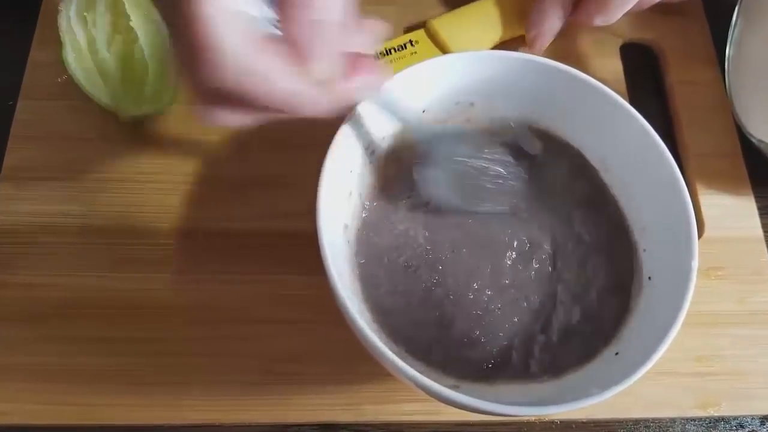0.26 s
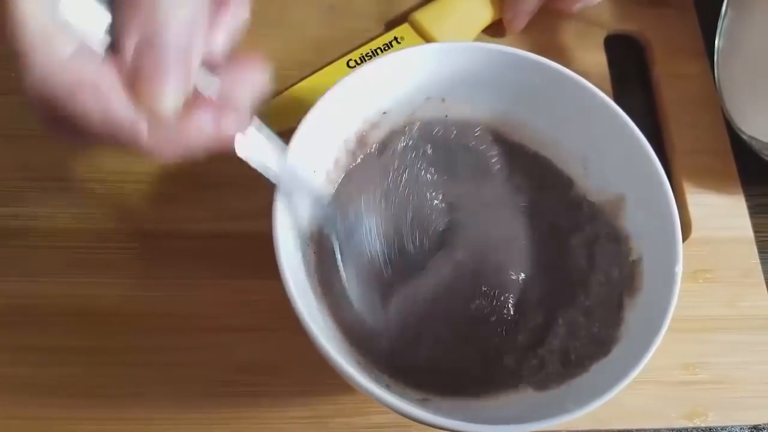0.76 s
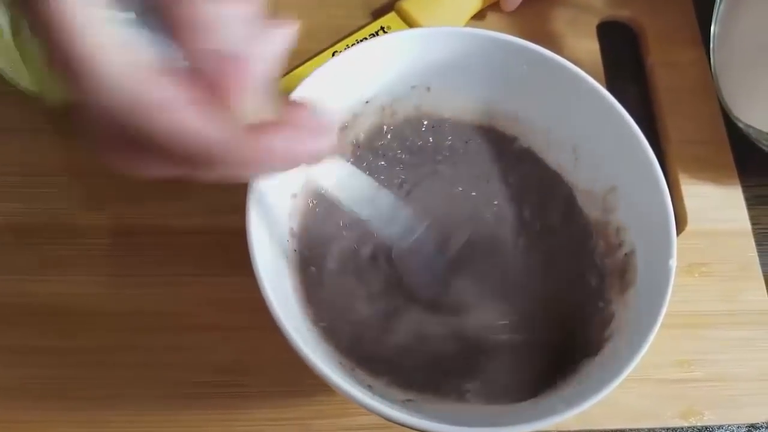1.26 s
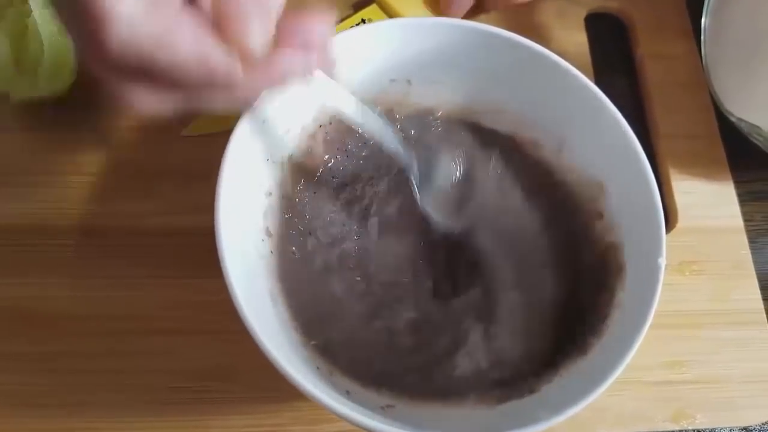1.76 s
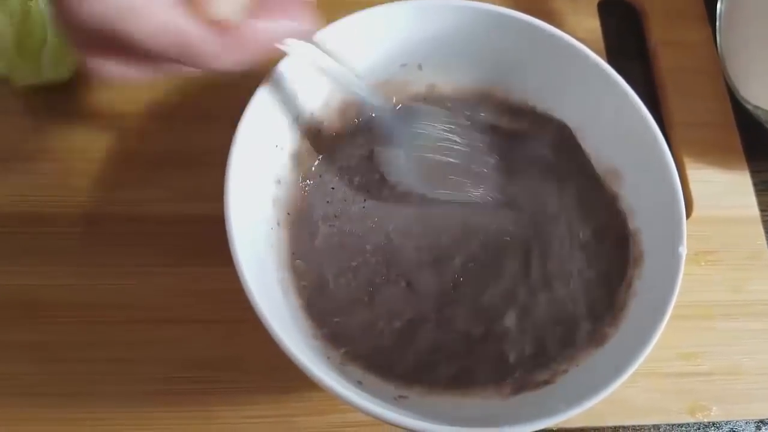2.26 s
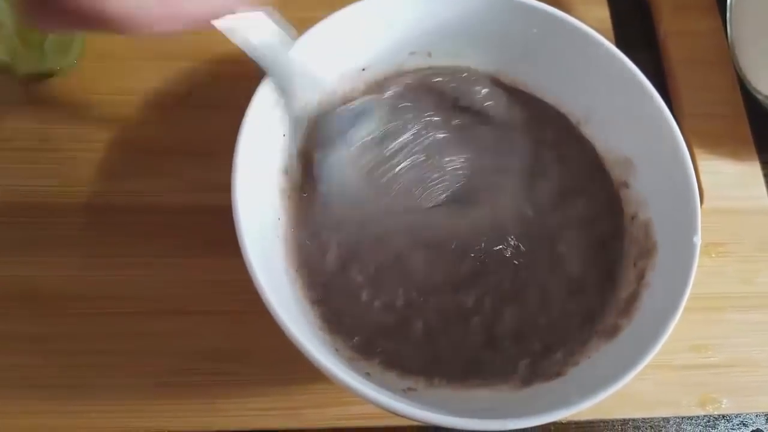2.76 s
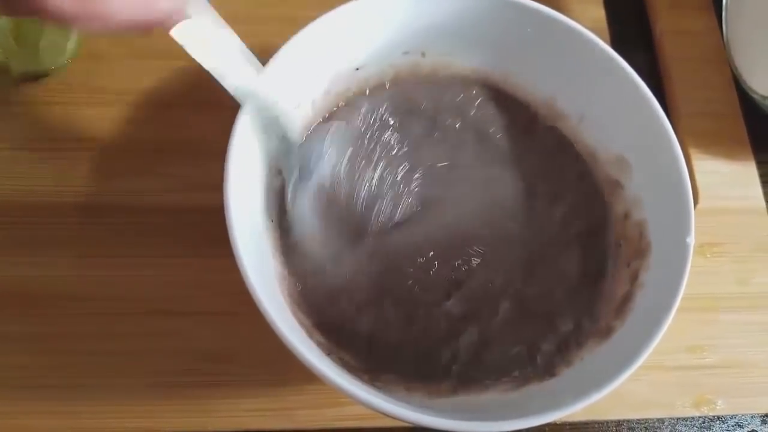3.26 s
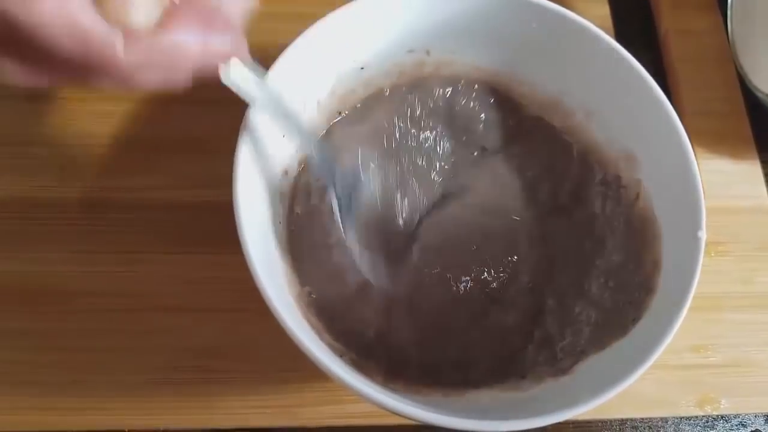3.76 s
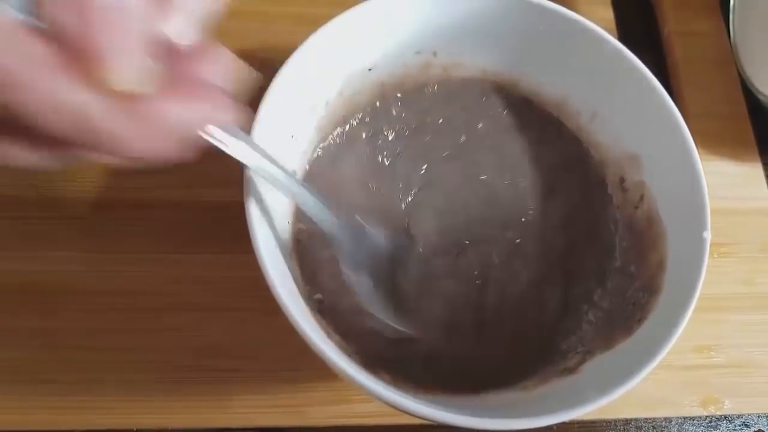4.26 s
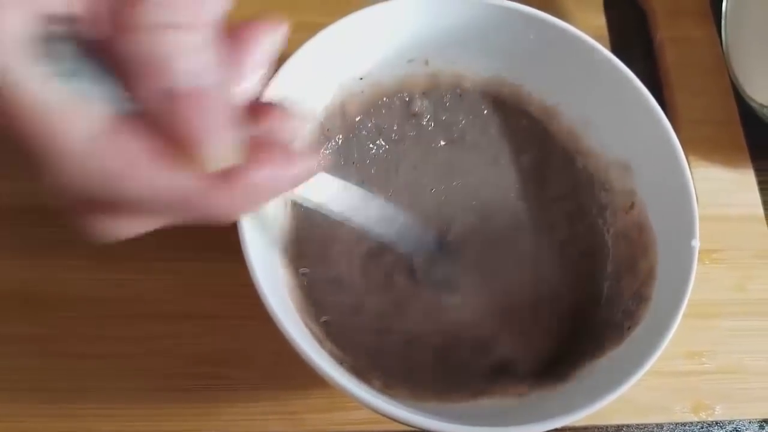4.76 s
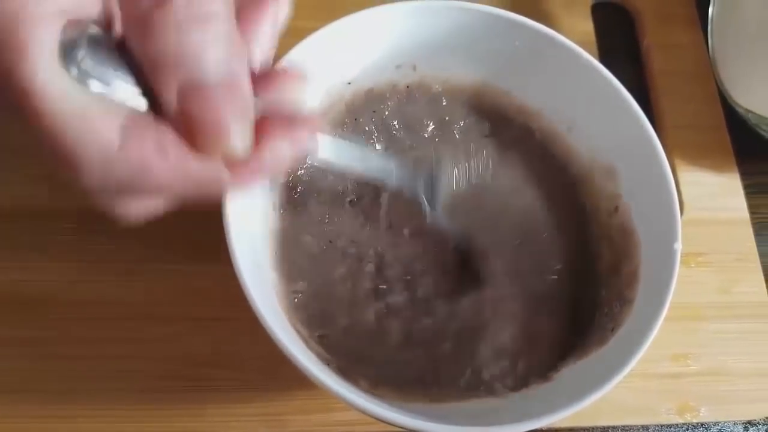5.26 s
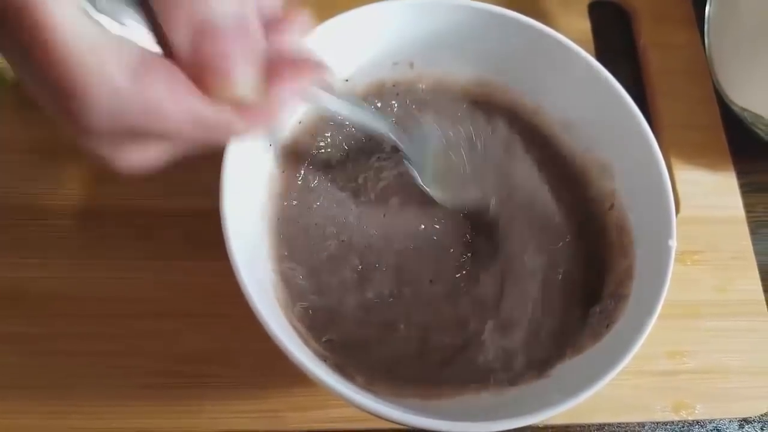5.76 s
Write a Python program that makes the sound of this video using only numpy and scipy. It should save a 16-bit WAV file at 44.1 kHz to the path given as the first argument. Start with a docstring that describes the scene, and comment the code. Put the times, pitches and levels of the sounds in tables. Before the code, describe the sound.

Close up in a small kitchen, a metal utensil briskly beats a thick sauce in a ceramic bowl. Wet, bubbly squelches swell about seven times a second, mixed with popping air pockets and soft plops. Dry clacks against the coated wall grow denser and louder in the second half, with an occasional brighter, short metallic clink. Faint board thumps and a low room hush lie beneath.

```python
"""A wet squelch of bursting bubbles swells about seven times a second as a metal spoon beats thick sauce;
random bubble noise is shaped by resonances of hollow, pocket and slit that differ with each stroke.
Dry knocks and brief clinks on a ceramic bowl excite damped resonances; on bare glaze the spoon rings too.
Air pockets pop, folds of sauce plop and gurgle as swelling tones and filtered puffs of noise, and the
wooden board thumps and rumbles; a small kitchen adds a diffuse echo and a low, wavering room tone."""
import sys
import numpy as np
from scipy import signal
from scipy.fft import rfft, irfft, next_fast_len
from scipy.io import wavfile
from scipy.ndimage import uniform_filter1d, map_coordinates

SR = 44100
rng = np.random.default_rng(int(sys.argv[2]) if len(sys.argv) > 2 else 0)


def digitize_waveform(pressure):
    """Quantize a signal to 16-bit integers and store it at the path in sys.argv[1].

    Rows of a 2-D input are taken as channels; values are limited to [-1, 1].
    """
    field = np.atleast_2d(pressure).T
    bounded = np.clip(field, -1, 1)
    quanta = np.round(bounded * 32767).astype(np.int16)
    wavfile.write(sys.argv[1], SR, quanta)


N = 265041
TIME = np.arange(N) / SR
BLOW = TIME[:SR // 4]   # time axis of one short event
FIRST = SR // 200   # the first five milliseconds of a blow set its level

# Sweeps of the spoon through the sauce: peak_s, rise_s, fall_s, squelch_db, then re squelch
# hollow_db, smack_db, spray_db, then hollow_hz, pocket_hz, slit_hz, slit_left_right_db
STROKES = [(0.027, 0.25, 0.038, -33.5, -11, 1, -11.5, 880, 1510, 2650, 1.5),
           (0.283, 0.076, 0.024, -33, -13, 0.5, -9.5, 830, 1410, 2670, 3.5),
           (0.487, 0.064, 0.03, -31, -24, 0.5, -12, 776, 1650, 2530, 2),
           (0.558, 0.025, 0.035, -45, -4.5, 4.5, -6, 700, 1360, 2600, 2),
           (0.697, 0.053, 0.011, -30.5, -18, 2.5, -9.5, 895, 1490, 2550, 1),
           (0.746, 0.053, 0.038, -45, 1, -12, -5, 720, 1320, 2580, 4),
           (0.885, 0.064, 0.037, -34, -13.5, 2, -8.5, 850, 1450, 2640, -0.5),
           (0.989, 0.051, 0.031, -41.5, -9, 5, -6, 890, 1410, 2750, 1),
           (1.117, 0.051, 0.052, -31, -13, 1.5, -10, 880, 1435, 2650, 4),
           (1.341, 0.044, 0.026, -31.5, -19, 3.5, -8.5, 880, 1470, 2440, -0.5),
           (1.548, 0.058, 0.049, -37.5, -13.5, 0, -14, 890, 1410, 2470, 4),
           (1.809, 0.067, 0.026, -36.5, -15.5, 1.5, -11, 880, 1410, 2590, -1.0),
           (2.02, 0.02, 0.043, -34.5, -11, 3.5, -6, 850, 1350, 2680, 4),
           (2.117, 0.019, 0.24, -46.5, 0.5, -10, -3.5, 830, 1440, 2600, 1.5),
           (2.264, 0.055, 0.021, -35, -29, 1.5, -14.5, 860, 1400, 2630, -2),
           (2.335, 0.019, 0.027, -38.5, -7, 2.5, -11.5, 840, 1490, 2500, 1.5),
           (2.495, 0.09, 0.062, -36.5, -12.5, 0.5, -11.5, 840, 1400, 2440, 4),
           (2.57, 0.0043, 0.021, -26, -11, 6, -4.5, 905, 1510, 2650, 2),
           (2.726, 0.074, 0.036, -35, -9, 2, -9.5, 810, 1310, 2660, 2),
           (2.959, 0.17, 0.013, -37.5, -15, 4, -7, 840, 1340, 2600, 3),
           (3.176, 0.041, 0.096, -30, -7.5, -0.5, -12, 780, 1370, 2560, -1.5),
           (3.3, 0.028, 0.021, -42, -6, 1, -7, 670, 1470, 2520, 3.5),
           (3.414, 0.032, 0.062, -33.5, -8, 5, -8.5, 830, 1320, 2770, 2),
           (3.65, 0.044, 0.053, -29.5, -12, 2.5, -7, 724, 1350, 2630, 0),
           (3.77, 0.026, 0.061, -40, -5, 3, -7.5, 690, 1460, 2370, 2.5),
           (3.915, 0.032, 0.042, -33, -3, -3, -8, 696, 1290, 2380, 0.5),
           (4.04, 0.1, 0.038, -43, -3, 3.5, -9, 650, 1500, 2380, 1.0),
           (4.16, 0.04, 0.047, -36.5, -4.5, 0.5, -8.5, 745, 1370, 2460, 11),
           (4.352, 0.019, 0.017, -39, 0.5, -6, -12, 720, 1350, 2370, 8),
           (4.392, 0.022, 0.076, -31.5, -6.5, 4, -10, 764, 1310, 2520, 4),
           (4.622, 0.099, 0.095, -43, 1, -2, -12, 780, 1270, 2450, 8),
           (4.825, 0.045, 0.065, -38.5, 1.5, 0, -10, 710, 1320, 2370, 2),
           (4.954, 0.021, 0.041, -48.5, -5, 6, 0, 666, 1500, 2630, 0.5),
           (5.058, 0.052, 0.051, -40, -1.5, 3.5, -7, 750, 1260, 2380, 7),
           (5.156, 0.013, 0.064, -39, -7, -1, -11, 700, 1550, 2520, -1),
           (5.285, 0.049, 0.23, -39.5, -1.5, 2, -5, 770, 1260, 2520, 4),
           (5.534, 0.073, 0.03, -43, -18, 3.5, -10, 746, 1280, 2510, 7),
           (5.57, 0.022, 0.012, -43, -5, 3.5, -20, 694, 1270, 2380, 5),
           (5.668, 0.027, 0.021, -38.5, -8, 6, -1.5, 750, 1490, 2640, -3),
           (5.765, 0.062, 0.04, -40, 2.5, 0.5, -5.5, 644, 1270, 2470, 9),
           (5.82, 0.034, 0.024, -38, -2.5, 5, -6.5, 660, 1360, 2380, 6.0),
           (6.0, 0.1, 0.03, -41.5, -3, -0.5, -5.5, 686, 1390, 2500, 9)]
# The two sides of the spoon: pocket_left_lead_ms, slit_left_lead_ms, spray_left_right_db
SPOON_SIDES = [(0.04, -0.14, 25), (0.14, -0.028, -20)]
# Spectrum of the wet spray: frequency_hz, relative_gain_db
SPRAY = [(1500, -41), (2900, 9), (3600, -7), (4700, 0), (5400, 2.5), (7500, -2.5), (10000, -4.5),
         (12800, -3.5), (14000, -12.5), (15500, -16)]
SWELL_SHAPE = 1.39   # 1 = pointed swell, 2 = round
DEPTH_LASTS, SPRAY_LASTS = 1.47, 0.94   # length of these parts re the stroke
# Between sweeps the spoon still drags through the sauce
DRAG_DB, DRAG_DEPTH_DB, DRAG_SMACK_DB, DRAG_SPRAY_DB = -55, -60, -52.5, -59.5
LIFT_LOSS = 0.83   # share of the squelch lost as the spoon lifts out ahead of a blow
PLUNGE_DB, PLUNGE_S = 7, 0.1   # extra drag as it drops back in
POCKET_WANDER, POCKET_CHANGES_PER_S = 0.085, 75   # spread of the log pitch; rate of its random points
PUSH_RISE = 0.12   # pitch change of the cavities per unit of relative stroke strength
GASPS_PER_S, GASP_DB = 120, 3.3
HISS_REST_HZ, HISS_RISE_HZ = 3400, 600   # the film torn off the spoon hisses higher with the push

# Spoon on the coated wall: start_s, level_db, then re level depth_db, smack_db, crack_db, then
# left_right_db, depth_hz, body_hz, smack_hz, air_time_before_s
KNOCKS = [(0.13, -40, 4.5, 14, 2, 1, 930, 1380, 2700, 0.0064),
          (0.772, -30, 3.5, 8.5, -2.5, 1, 930, 1220, 2690, 0.041),
          (1.177, -41.5, 4, -10, 10, 2, 870, 1240, 2790, 0.0014),
          (1.266, -38, -23, -20, -12, 5, 920, 1268, 2760, 0.11),
          (1.4402, -28, 1.5, 6, 3.5, 3, 824, 1350, 2550, 0.027),
          (1.5798, -21, -5.5, -3, -20, 2.5, 986, 1400, 2650, 0.002),
          (1.9917, -29, -13, -8, -3.5, 7, 870, 1450, 2660, 0),
          (2.1083, -21.5, -1.5, 7, 0, 4.5, 940, 1620, 2650, 0.068),
          (2.5912, -24.5, 2, -2, -4, 0, 920, 1580, 2120, 0.052),
          (2.7969, -39.5, 4, 7, 0.5, 0, 750, 1478, 2330, 0.022),
          (2.892, -29, 3.5, -7, 0, 2, 750, 1400, 2800, 0.009),
          (3.0401, -20, -5, 0, -10, 3, 676, 1490, 2640, 0.026),
          (3.263, -16, -5.5, -1.5, -10.5, 2.5, 764, 1384, 2090, 0.086),
          (3.3717, -25, -4.5, -22, -10, 6, 627, 1420, 2500, 0.00038),
          (3.4963, -38, -1.5, -3, 1.5, -2.5, 784, 1516, 2090, 0),
          (3.5088, -37, 0, 8, -14, 7, 680, 1370, 2500, 0.074),
          (3.5476, -34.5, 0, 4, 3, 3, 730, 1550, 2400, 0.013),
          (3.5613, -31, -6, -44, -2, 3, 664, 1540, 2090, 0.00019),
          (3.7165, -29, -6, 1.5, -3.5, 1, 626, 1390, 2400, 0.067),
          (3.8687, -20.5, -2, -5.5, -4, 2, 650, 1270, 2740, 0.02),
          (3.8825, -34.5, -5, 2.5, -16, -4, 680, 1330, 2510, 0.0031),
          (3.9224, -29.5, 4, -5.5, -6, 1, 647, 1270, 2360, 0),
          (4.0127, -29, -2, -5, -23, 0, 650, 1460, 2430, 0.077),
          (4.1337, -34.5, -42, -6, 4, 1, 810, 1310, 2430, 0.0011),
          (4.213, -31, -6, -8, -7, 5, 745, 1430, 2480, 0.009),
          (4.256, -13, -3.5, -4, -10, 2.5, 750, 1427, 1980, 0.0089),
          (4.432, -32.5, -1, 0.5, -3.5, 0, 650, 1370, 2180, 0.049),
          (4.458, -38, 3, 0, -25, -2, 610, 1380, 2050, 0.017),
          (4.5126, -29, 1.5, -6, -18, -2, 650, 1400, 2400, 0),
          (4.5735, -34.5, -0.5, -15, -9, 0, 660, 1240, 2480, 0),
          (4.6938, -24.5, -7.5, -0.5, -8, 4, 764, 1380, 2500, 0.018),
          (4.7154, -18.5, -5, -7, -20, 1, 690, 1450, 2540, 0.0058),
          (4.9244, -17.5, -3, 1.5, -5, 1, 650, 1430, 2640, 0.061),
          (5.0208, -35, 7.5, 1, 2.5, 2.5, 600, 1220, 2520, 0.0044),
          (5.3864, -30, -4.5, -2.5, -11, 1.5, 634, 1520, 2550, 0.039),
          (5.444, -25, -2.5, -11, -3, -1, 736, 1360, 2740, 0),
          (5.5041, -21, -9.5, -4, -10.5, 4, 740, 1280, 2250, 0.0052),
          (5.5315, -21, -3.5, -6, -21, 2, 805, 1170, 2700, 0.0015),
          (5.564, -29, 2, -19, -13, 0, 657, 1250, 2150, 0), (5.8071, -32, 2, 0, -2, 0, 650, 1310, 2100, 0),
          (5.892, -20, -2.5, 1.5, -1, 2, 647, 1350, 2720, 0.078),
          (5.98, -41.5, 8.5, -1, -5, -2, 600, 1310, 2640, 0)]
# Spoon on bare glaze: start_s, level_db, then re level depth_db, smack_db, crack_db, then
# left_right_db, extra_high_ring_db, air_time_before_s
CLINKS = [(0.3684, -25.5, -4.5, -0.5, 1, 3, 8, 0.003), (0.387, -26, -24, -12, -5.5, -6, -12, 0.034),
          (1.683, -29, -3.5, 5, 2.5, 5, -2.5, 0.0096), (1.921, -31.5, -7.5, 1.5, 0.5, -0.5, 9, 0.038),
          (2.6035, -27, -4, 11, 4.5, 0, -5, 0), (2.6194, -27.5, 0, 1, 0, -1, 14.5, 0.0029),
          (4.4918, -25.5, 2.5, 0, 0.5, 2.5, 2, 0.083), (5.422, -24.5, 4, 3, 2.5, 2.5, 2, 0.032)]
# Broad resonances of the filled bowl, in four groups: centre_hz, width_hz, relative_level_db
DEPTH = [(486, 176, -4), (625, 73.3, 6), (830, 202, -5.5)]
BODY = [(1260, 121, -2), (1511, 158, 0)]
SMACK = [(2090, 570, -6), (2650, 209, 6.5), (2990, 470, -6), (3690, 410, -5)]
CRACK = [(3910, 1200, -3), (4150, 310, 0), (5470, 840, -1), (6900, 530, 1), (8930, 360, -9),
         (10700, 570, -4), (14200, 10000, -11)]
# Reference centres for a blow in the middle of the wall: depth_hz, body_hz, smack_hz
BOWL_HZ = (650, 1400, 2650)
# Ringing modes of the spoon: pitch_hz, relative_level_db, t60_s
SPOON = [(3085, -1.5, 0.16), (3960, -8, 0.085), (4060, 3, 0.041), (4280, -1, 0.076), (5330, -6, 0.074),
         (5540, -4, 0.085), (7950, -8, .07), (7990, -7, 0.15), (11250, -11, 0.086)]
# Grazes of the spoon edge on the bowl: start_s, relative_level_db, pitch_hz
TICKS = [(1.667, -35, 4970), (2.259, -28, 3200), (2.345, -29, 3400), (2.396, -29.5, 1840),
         (2.5522, -36, 7600), (2.677, -26.5, 9280), (2.8477, -34, 5080), (3.305, -32, 5400),
         (4.2035, -32, 2400), (4.229, -26, 2300), (4.6722, -32.5, 7060)]
KNOCK_LEAD_MS, CLINK_LEAD_MS, POP_LEAD_MS = 0.064, 0.052, 0.07   # mean lead of the left channel
LEAD_SPREAD_MS = 0.026   # each blow lands on a slightly different spot
HIGH_MODES_HZ = 7000
GRATE_S, RING_ROUGH, SLIDE_RADIANS, SLIDE_S = 0.013, 0.7, 0.85, 0.05

# Large air pockets bursting: start_s, level_db, pitch_hz, overtone_db re level, left_right_db
POPS = [(0.212, -32, 1340, -22, -1), (0.253, -31.5, 1510, 2, 1), (0.27, -35, 1440, 6, 4.5),
        (.289, -33, 1450, -10, -1.5), (0.481, -30, 2030, 8, 24), (0.651, -29, 1400, -8.5, -1),
        (0.6932, -17.5, 1460, 1, 5), (0.8568, -22.5, 1490, -16, 0), (0.9061, -16, 1427, -8, 3.5),
        (1.124, -26.5, 1410, 1, 5), (1.301, -26.5, 1430, -32, 3), (1.337, -31, 1530, -3, 4),
        (1.568, -36, 1400, -19, 0), (1.7596, -26.5, 1400, -9, 4), (1.7894, -29.5, 1480, -1.5, 7),
        (2.211, -20, 1364, -28, 5), (2.483, -34, 1410, -3, 1), (2.717, -33, 1360, -4.5, 0),
        (3.134, -33, 1280, -32, 13), (3.1467, -16, 1330, -13, 0), (3.398, -20.5, 1260, -20, 2),
        (3.61, -20.5, 1330, -24, 3), (4.633, -39, 1230, -2, 0), (4.799, -35, 1230, -19, 3),
        (4.837, -22.5, 1230, -39, -1), (5.092, -31, 1300, -40, -2.5), (5.148, -30.5, 1460, -25, 1)]
# Sauce folding back: start_s, level_db, pitch_hz, deeper_cavity_db re level, swell_s
GLOOPS = [(0.339, -37.5, 537, -27, .004), (.385, -32.5, 526, -11, 0.0075), (.481, -37.5, 576, -22, 0.0044),
          (.541, -39, 543, -27, 0.0052), (.729, -37.5, 580, -5, .006), (0.774, -49, 477, -5, 0.0067),
          (1.386, -41.5, 536, -3.5, .003), (1.407, -46.5, 445, -5, 0.0036), (1.69, -52.5, 427, 2, .004),
          (1.848, -63, 500, -3, .004), (1.926, -54.5, 317, -4.5, 0.0056), (2.081, -49, 550, -4, .004),
          (2.616, -32, 517, -10.5, 0.0032), (3, -34.5, 515, -8.5, 0.0044), (3.336, -39, 596, -6, 0.0073),
          (3.607, -31.5, 684, -20.5, 0.0038), (3.691, -27, 541, -11, 0.0046),
          (5.434, -31, 406, -19, 0.0032)]
GURGLE_GAP_S, GURGLE_LOSS_DB = 0.0087, 1.5   # mean spacing of the gulps; loss per gulp
CAVITY_HZ, CAVITY_WIDTH_HZ = 249, 34   # the large hollow under the fold
# Thumps of the bowl on the board: start_s, level_db, mean_pitch_hz
THUMPS = [(.387, -43, 100), (0.493, -48, 125), (0.688, -50, 110), (1.359, -44, 100), (1.431, -44.5, 104),
          (1.69, -53, 110), (1.845, -53, 129), (1.929, -59, 111), (2.075, -50, 120), (2.893, -47, 120),
          (3.004, -46, 128), (3.331, -35.5, 127), (3.369, -43, 136), (3.601, -43, 111), (3.691, -43, 136),
          (5.43, -55, 106)]
# Spectrum of the board's rumble: frequency_hz, relative_gain_db
BOARD = [(25, -25), (60, 1.5), (110, 3.5), (190, -3.5), (250, -8.5), (380, -7.5), (520, -52), (900, 6),
         (3000, -88)]

# Decay of the kitchen echo: frequency_hz, t60_s
ROOM_T60 = [(150, .33), (600, .24), (1400, .22), (2700, .24), (6000, .22), (15000, .17)]
# Strength of the kitchen echo: frequency_hz, gain_db
ROOM_DB = [(150, -2), (600, -5.5), (1400, -10.5), (2700, -5), (6000, -14), (15000, -10)]
# Spectrum of the room tone: frequency_hz, relative_gain_db
FLOOR = [(20, 4), (50, 10), (95, 12.5), (160, 1.5), (400, -1.5), (1500, -34), (5000, -89), (16000, -54)]
ROOM_WAVER_DB, ROOM_WAVERS_PER_S = 3, 16
# Left and right hear the bowl from different sides: frequency_hz, left_right_db
TILT = [(100, -0.5), (350, 0.5), (700, -2.5), (1400, -0.5), (2700, -5), (5500, 1.5), (10000, 1.5),
        (15000, 3)]
# Bands turned down when quiet: lower_edge_hz, threshold_db
QUIET = [(350, -32.5), (950, -43), (2000, -29.5), (3400, -35.5)]
CUTOFF_HZ = 16000


def squelch(depth_db=0.0, pocket_db=0.5, smack_db=-4.0, slit_db=-2.0, spray_db=2.5, squeeze_db=-12.5,
            depth_width_hz=170, pocket_width_hz=170, slit_width_hz=210, film_db=-7.5):
    """Cavity resonance: bubbles burst on both sides of the spoon and sound through hollow, pocket and slit."""
    peak_s, _, _, level, depth_re, smack_re, spray_re, *shape = np.transpose(STROKES)
    depth_hz, pocket_hz, slit_hz, slit_pan_db = [np.interp(TIME, peak_s, column) for column in shape]
    body = effort(level, DRAG_DB)
    depth = effort(level + depth_re, DRAG_DEPTH_DB, DEPTH_LASTS) * from_db(depth_db)
    smack = effort(level + smack_re, DRAG_SMACK_DB)
    spray = effort(level + spray_re, DRAG_SPRAY_DB, SPRAY_LASTS) * from_db(spray_db)
    push = body / body.max()   # 1 in the hardest stroke
    stroke_share = np.minimum(body / from_db(np.interp(TIME, peak_s, level)), 1)
    tighten = 1 + PUSH_RISE * (stroke_share - 0.7)
    gasps = evened(from_db(GASP_DB * drift(GASPS_PER_S)))   # the sauce sticks and lets go

    def wander():   # cavity sizes vary at random and tighten with the push
        return tighten * np.exp(POCKET_WANDER * drift(POCKET_CHANGES_PER_S))

    def large():
        return gasps * bursts(per_s=450, size_db=1.5, clump_db=2.0, smear=0.15)

    def small():
        return gasps * bursts(per_s=1100, size_db=2.0, clump_db=2.2, smear=0.2)

    pocket_hz = pocket_hz * wander()
    slit_hz = slit_hz * wander()
    squeeze_hz = 850 + 1400 * push   # air squeezed ahead of the spoon rises in pitch with the push
    slit_pan = from_db(slit_pan_db * [[0.5], [-0.5]])
    out = 0
    for pocket_lead_ms, slit_lead_ms, spray_pan_db in SPOON_SIDES:
        squeeze = glide(large(), squeeze_hz * np.exp(0.159 * drift(32)), width=61)
        pocket = glide(large(), pocket_hz, pocket_width_hz)
        hollow = resonate(large(), DEPTH) + 0.03 * glide(large(), depth_hz * wander(), depth_width_hz)
        low = body * from_db(pocket_db) * evened(between(pocket, 870, 1860))
        low += body * from_db(squeeze_db) * evened(between(squeeze, 830, 3200))
        low += depth * evened(between(hollow, 460, 1300))

        slit = glide(small(), slit_hz, slit_width_hz)
        high = smack * from_db(slit_db) * evened(between(slit, 1900, 3460))
        high += smack * from_db(smack_db) * evened(between(resonate(small(), SMACK), 880, 6400))

        film = glide(small(), (HISS_REST_HZ + HISS_RISE_HZ * push) * wander(), width=340)
        fizz = 0.7 * small() + bursts(per_s=4000, size_db=3.0, clump_db=2.4, smear=0.4)
        fine = from_db(film_db) * evened(between(film, 3040, 7200)) + coloured(fizz, SPRAY)

        out = out + place(low, 0.9, pocket_lead_ms) + slit_pan * place(high, 0, slit_lead_ms)
        out = out + place(spray * fine, spray_pan_db, 0)
    return out / np.sqrt(2)


def effort(stroke_db, drag_db, lasts=1):
    """Power addition: stroke swells join the drag; the spoon lifts out before blows and plunges back after."""
    t = TIME[::SR // 1000]   # about one point per millisecond
    sweeps, drag, immersed = 0, 1, 1
    for (s, rise_s, fall_s, *_), db in zip(STROKES, stroke_db):
        away = np.abs((t - s) / np.where(t < s, rise_s, fall_s) / lasts)
        sweeps = sweeps + (from_db(db) * np.exp(-away ** SWELL_SHAPE)) ** 2
    for s, *_, air_s in KNOCKS + CLINKS:
        if air_s > 0:
            immersed = immersed * (1 - LIFT_LOSS * (t < s) * np.exp(-((t - s) / air_s) ** 2))
            plunge = from_db(PLUNGE_DB) * np.exp(-np.abs(t - s) / PLUNGE_S)
            drag = drag + (t >= s) * plunge ** 2
    return np.interp(TIME, t, immersed * np.sqrt(sweeps + drag * from_db(drag_db) ** 2))


def bursts(per_s, size_db, clump_db, smear):
    """Random impulses: tiny bubbles burst in clumps over a smooth wet hiss."""
    sizes = from_db(size_db * np.minimum(rng.exponential(1, N), 4)) * rng.choice([-1, 1], N)
    grains = rms_one(sizes * (rng.random(N) < per_s / SR)) + smear * rng.standard_normal(N)
    clumps_db = clump_db * (1.13 * drift(260) + 1.14 * drift(70))
    return evened(grains * from_db(clumps_db))


def knocks(bite_db=-2.5, settle_db=-13.0, settle_s=0.0024, tick_db=-8.5):
    """Damped impact: the spoon clacks through the sauce, then bowl and spoon chatter as they settle."""
    out = np.zeros((2, N))
    for s, db, depth_db, smack_db, crack_db, pan_db, *pitches, _ in KNOCKS:
        force = contact(skid_s=0.00092, grit=0.17)
        blow = bowl(force, db, depth_db, smack_db, crack_db + bite_db, skid_s=0.0029, pitches=pitches)
        # the bare crack scatters differently to each channel
        snap_db = db + crack_db / 2 + tick_db
        snap = np.array([tick(snap_db, low_hz=1750, high_hz=5850, skid_s=0.0022) for _ in range(2)])
        chatter = rng.standard_normal(len(BLOW)) * np.exp(-BLOW / settle_s)
        settle = bowl(chatter, db + settle_db, depth_db, smack_db, crack_db, skid_s=settle_s)
        add(out, s, place(blow, pan_db, rng.normal(KNOCK_LEAD_MS, LEAD_SPREAD_MS)))
        add(out, s, snap + place(settle, 0, rng.normal(0.2, 0.064)))
    return out


def clinks(bite_db=-0.5, ring_db=-6.5, scratch_db=-12.0, grate_db=-6.0):
    """Modal ringing: metal grates on bare glaze and the spoon's modes die away while it still slides."""
    out = np.zeros((2, N))
    for s, db, depth_db, smack_db, crack_db, pan_db, high_db, _ in CLINKS:
        force = contact(skid_s=0.0017, grit=0.39)
        scratch = signal.sosfilt(signal.butter(2, 6000, "high", fs=SR, output="sos"), force)
        blow = bowl(force, db, depth_db, smack_db, crack_db + bite_db, skid_s=0.0031)
        blow += at_level(scratch, db + crack_db + scratch_db)
        roughness = from_db(4 * drift(380, size=len(BLOW)))
        slips = rng.standard_normal(len(BLOW)) * roughness * np.exp(-BLOW / GRATE_S)
        blow += at_level(resonate(slips, CRACK), db + crack_db + grate_db)
        for hz, mode_db, t60 in SPOON:
            strength_db = db + crack_db + ring_db + mode_db + 2 * rng.normal()
            strength_db += high_db * (hz > HIGH_MODES_HZ)
            slide = SLIDE_RADIANS * np.exp(-BLOW / SLIDE_S)   # the moving contact smears each pitch
            grating = 1 + RING_ROUGH * drift(208, size=len(BLOW))
            phase = 2 * np.pi * hz * rng.normal(1, 0.0024) * BLOW + slide * drift(180, size=len(BLOW))
            blow += grating * from_db(strength_db - 60 * BLOW / t60) * np.sin(phase)
        add(out, s, place(blow, pan_db, rng.normal(CLINK_LEAD_MS, LEAD_SPREAD_MS)))
    return out


def bowl(force, db, depth_db, smack_db, crack_db, skid_s, pitches=BOWL_HZ, spread=0.0057):
    """Forced resonance: the spot hit shifts the damped bowl's pitches; skidding feeds the highest group."""
    skid = rng.standard_normal(len(BLOW)) * np.exp(-BLOW / skid_s)
    groups = [(force, DEPTH, depth_db), (force, BODY, 0), (force, SMACK, smack_db), (skid, CRACK, crack_db)]
    shifts = np.append(np.divide(pitches, BOWL_HZ), np.exp(0.04 * rng.normal()))
    shifts = shifts * np.exp(spread * rng.normal(size=4))
    return sum(at_level(resonate(drive, modes, shift), db + rel)
               for (drive, modes, rel), shift in zip(groups, shifts))


def contact(skid_s, grit):
    """Impulse and friction: a sharp touch, then the spoon skids for a moment as decaying noise."""
    force = grit * rng.standard_normal(len(BLOW)) * np.exp(-BLOW / skid_s)
    force[0] += 1
    return force


def tick(db, low_hz, high_hz, skid_s):
    """Direct radiation: the bare crack of a touch, without the bowl's resonances."""
    edges = [min(low_hz, 3000), np.clip(high_hz, 3500, 18000)]
    band = signal.butter(1, edges, "band", fs=SR, output="sos")
    return at_level(signal.sosfilt(band, contact(skid_s, grit=0.15)), db)


def ticks(gain_db=-10.0, cycles=1.3):
    """Heavily damped resonance: the edge of the spoon grazes the bowl in tiny dry ticks."""
    out = np.zeros((2, N))
    for s, db, hz in TICKS:
        graze = resonate(contact(skid_s=0.0011, grit=0.36), [(hz, hz / cycles / 2, 0)])
        add(out, s, place(at_level(graze, db + gain_db), pan_db=2.5, lead_ms=0.028))
    return out


def pops(swell_s=0.00098, overtone_hz=2630, tear_db=-12.0):
    """Transient cavity resonance: a pocket's skin tears, it opens within milliseconds and rings briefly."""
    out = np.zeros((2, N))
    swell = (BLOW / swell_s) ** 2 * np.exp(-BLOW / swell_s)
    for s, db, hz, overtone_db, pan_db in POPS:
        tone = at_level(swell * np.sin(2 * np.pi * hz * BLOW), db)
        upper_hz = overtone_hz * rng.normal(1, 0.0028)
        upper = at_level(swell * np.sin(2 * np.pi * upper_hz * BLOW), db + overtone_db)
        tear = tick(db + tear_db, low_hz=596, high_hz=3460, skid_s=0.0049)
        add(out, s, place(tone + upper + tear, pan_db, POP_LEAD_MS))
    return out


def flecks(per_s=70, level_db=-7.0, cycles=1.5, low_hz=1000, high_hz=3200, count=8):
    """Bubble resonance: single drops and bubbles snap with the sweeps at one of several pitches."""
    snaps = rng.choice([-1, 1], N) * (rng.random(N) < per_s / SR)
    dealt, out = rng.integers(0, count, N), 0   # each snap is dealt to one pitch
    for k, hz in enumerate(np.geomspace(low_hz, high_hz, count)):
        ringing = resonate(snaps * (dealt == k), [(hz, hz / cycles, 0)])
        snap = rms_one(between(ringing, hz / 2, 1.54 * hz))
        out = out + place(snap, rng.normal(0, 6.9), rng.normal(0.13, 0.07))
    return from_db(level_db) * effort(np.array(STROKES)[:, 3], DRAG_DB) * rms_one(out)


def gloops(bend=-0.068, bend_s=0.018, plop_db=-3.0, gurgle_db=-6.5, gulp_s=0.0022, cycles=4.0,
           scatter=0.15, uneven_db=0.5, cavity_db=0.5, count=4):
    """Coupled cavities: a fold closes with a sagging plop; uneven, weakening gulps stir the hollow beneath."""
    out = np.zeros((2, N))

    def brief(x):   # energy of a ten-millisecond sound of rms 1
        return rms_one(x) * np.sqrt(2 * FIRST / len(BLOW))

    for start, db, hz, second_db, swell_s in GLOOPS:
        pitch = hz * (1 + bend * np.tanh((BLOW - swell_s) / bend_s))
        swell = (BLOW / swell_s) ** 2 * np.exp(-2 * BLOW / swell_s)
        plop = swell * np.sin(2 * np.pi * np.cumsum(pitch) / SR)
        add(out, start, place(from_db(db + plop_db) * brief(plop), pan_db=5.0, lead_ms=0.16))
        for k in range(count):
            puff = rng.standard_normal(len(BLOW)) * BLOW / gulp_s * np.exp(-BLOW / gulp_s)
            late, high, loud = rng.standard_normal(3)
            gulp = resonate(puff, [(hz * np.exp(scatter * high), hz / cycles, 0)])
            gulp = between(gulp, hz / 2, 1.22 * hz)
            hollow = between(resonate(puff, [(CAVITY_HZ, CAVITY_WIDTH_HZ, 0)]), 125, 390)
            sound = from_db(gurgle_db) * brief(gulp) + from_db(second_db + cavity_db) * brief(hollow)
            strength = from_db(db - GURGLE_LOSS_DB * k + uneven_db * loud)
            gulp_start = start + GURGLE_GAP_S * k * (1 + 0.221 * late)
            add(out, gulp_start, place(strength * sound, pan_db=-0.5, lead_ms=0.17))
    return out


def thumps(swell_s=0.0097, wobble=0.24):
    """Low-frequency rocking: a hard push rocks the bowl on the board for a few soft, uneven cycles."""
    out = np.zeros((2, N))
    swell = BLOW / swell_s * np.exp(1 - BLOW / swell_s)
    for s, db, hz in THUMPS:
        pitch = hz * (1 + wobble * drift(163, size=len(BLOW)))
        thump = from_db(db) * swell * np.sin(2 * np.pi * np.cumsum(pitch) / SR)
        add(out, s, place(thump, pan_db=-3.0, lead_ms=0.091))
    return out


def board(level_db=-54.5, rock_db=-15.5, rock_s=0.011, blow_db=-14.0):
    """Structure-borne noise: the board rumbles unevenly, more when sauce folds or bare glaze is struck."""
    power = from_db(level_db + 2 * drift(25)) ** 2
    shoves = [(s, db + max(second_db, 0) + rock_db) for s, db, _, second_db, _ in GLOOPS]
    shoves += [(s, db + blow_db) for s, db, *_ in CLINKS]
    for s, db in shoves:
        age = np.maximum(TIME - s, 0) / rock_s
        power = power + (from_db(db) * age * np.exp(1 - age)) ** 2
    return np.sqrt(power) * wide_noise(BOARD, side=0.49)


def kitchen(x, first_s=0.00037, build_s=0.00026):
    """Diffuse reverberation: noise bands about an octave wide each decay at their own rate."""
    t = TIME[:SR // 2]
    onset = 1 - np.exp(-np.maximum(t - first_s, 0) / build_s)
    edges = np.geomspace(80, 18000, 9)
    echo = 0
    for low, high in zip(edges, edges[1:]):
        hz = np.sqrt(low * high)
        band = between(rng.standard_normal((2, len(t))), low, high)
        band = band * onset * 10 ** (-3 * t / at_hz(ROOM_T60, hz))
        energy = np.sum(band ** 2, axis=1, keepdims=True)
        echo = echo + band * from_db(at_hz(ROOM_DB, hz)) * np.sqrt(2 * (high - low) / SR / energy)
    return signal.fftconvolve(x, echo, axes=1)[:, :N]


def room_tone(level_db=-62.5):
    """Ambient noise: a low coloured hush whose level wavers at random."""
    waver = from_db(ROOM_WAVER_DB * drift(ROOM_WAVERS_PER_S))
    return from_db(level_db) * waver * wide_noise(FLOOR, side=0.4)


def wide_noise(spectrum, side):
    """Partial coherence: steady stereo noise, partly shared by both channels."""
    mid, difference = coloured(rng.standard_normal((2, N)), spectrum)
    return rms_one(np.array([mid + side * difference, mid - side * difference]))


def resonate(x, modes, detune=1):
    """Modal superposition: parallel two-pole resonances with alternating signs."""
    out = 0
    for k, (hz, width, db) in enumerate(modes):
        r = np.exp(-np.pi * width / SR)
        w = 2 * np.pi * hz * detune / SR
        zeros = [(1 - r * r) / 2, 0, (r * r - 1) / 2]
        poles = [1, -2 * r * np.cos(w), r * r]
        out = out + (-1) ** k * from_db(db) * signal.lfilter(zeros, poles, x + 1e-18)
    return out


def glide(x, hz, width):
    """Heterodyning: a moving resonance shifts sound down by its pitch, smooths it and shifts it back."""
    turn = np.exp(2j * np.pi * np.cumsum(hz) / SR)
    return np.real(signal.lfilter([1], [1, -np.exp(-np.pi * width / SR)], x / turn) * turn)


def between(x, low_hz, high_hz):
    """Band-pass filtering: keep one band."""
    edges = [low_hz, min(high_hz, 20000)]
    return signal.sosfilt(signal.butter(2, edges, "band", fs=SR, output="sos"), x)


def at_hz(points, hz):
    """Logarithmic frequency: interpolate a table on a log-frequency axis."""
    table = np.array(points)
    return np.interp(np.log(hz + 1e-9), np.log(table[:, 0]), table[:, 1])


def filtered(x, spectrum):
    """Spectral weighting: apply a table of frequency_hz, gain_db."""
    size = next_fast_len(N)
    gains = from_db(at_hz(spectrum, np.fft.rfftfreq(size, 1 / SR)))
    return irfft(rfft(x, size) * gains, size)[..., :N]


def coloured(x, spectrum):
    """Spectral weighting at unit power: filter by a table and scale to rms 1."""
    return rms_one(filtered(x, spectrum))


def drift(rate, size=N):
    """Random fluctuation: normal values, rate per second, joined by lines and scaled to rms 1."""
    steps = rng.standard_normal(4000)
    return rms_one(np.interp(TIME[:size] * rate, np.arange(len(steps)), steps))


def evened(x):
    """Power normalisation: keep the fine grain but hold the level steady over 40 ms."""
    return x / np.sqrt(np.abs(uniform_filter1d(x ** 2, SR // 25)) + 1e-20)


def from_db(db):
    """Logarithmic level: decibels to amplitude gain."""
    return 10 ** (np.asarray(db) / 20)


def rms_one(x):
    """Power normalisation: scale to rms 1."""
    return x / np.sqrt(np.mean(x ** 2) + 1e-20)


def at_level(x, db):
    """Short-time level: set the rms of a blow's first five milliseconds."""
    return x * from_db(db) * np.sqrt(FIRST / (np.sum(x[:FIRST] ** 2) + 1e-20))


def place(x, pan_db, lead_ms):
    """Interaural-style cues: a level difference, and the right channel delayed by the left's lead."""
    at = np.arange(len(x))
    right = map_coordinates(x, [at - lead_ms * SR / 1000], order=3)
    gains = from_db([[pan_db / 2], [-pan_db / 2]])
    return np.array([x, right]) * rms_one(gains)


def add(out, s, sound):
    """Superposition: mix a stereo sound in at time s."""
    at = max(round(s * SR), 0)
    out[:, at:at + sound.shape[1]] += sound[:, :N - at]


def suppress(x, slope=0.25, most_db=4.5, window_s=0.026):
    """Downward expansion: each band is turned down further as it sinks below its threshold."""
    above = [filtered(x, [(0.8 * hz, -40), (hz, -6), (1.2 * hz, 0)]) for hz, _ in QUIET] + [0]
    out = x - above[0]
    for (_, threshold_db), wide, higher in zip(QUIET, above, above[1:]):
        band = wide - higher
        power = np.abs(uniform_filter1d(np.mean(band ** 2, axis=0), int(window_s * SR)))
        under_db = np.maximum(threshold_db - 10 * np.log10(power + 1e-12), 0)
        out = out + band * from_db(-np.minimum(slope * under_db, most_db))
    return out


def scene():
    """Superposition of direct sound, its kitchen echo, the board's rumble and the room tone."""
    near = squelch() + knocks() + clinks() + ticks() + pops() + flecks() + gloops() + thumps()
    # fine droplets splash
    near = near + flecks(per_s=60, level_db=-17.5, cycles=5.0, low_hz=3200, high_hz=6500, count=5)
    return near + kitchen(near) + board() + room_tone()


def record(dry):
    """Linear and nonlinear shaping: colour each channel, lower quiet bands, clip peaks, cut the top."""
    sides = [1, -1]
    channels = np.array([filtered(x, [(hz, side * db / 2) for hz, db in TILT]) for x, side in zip(dry, sides)])
    clipped = np.clip(suppress(channels), -0.97, 0.97)
    return signal.sosfilt(signal.ellip(10, 0.1, 80, CUTOFF_HZ, fs=SR, output="sos"), clipped)


dry = scene()
out = record(dry)
digitize_waveform(out)
```